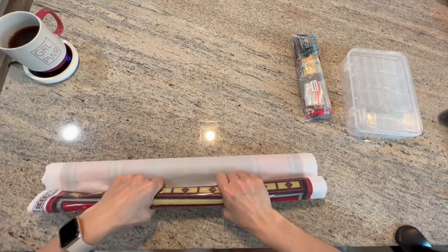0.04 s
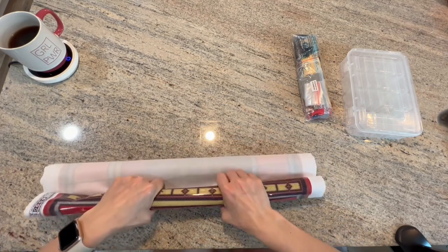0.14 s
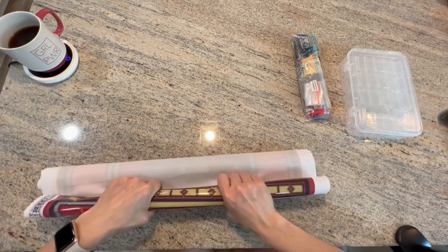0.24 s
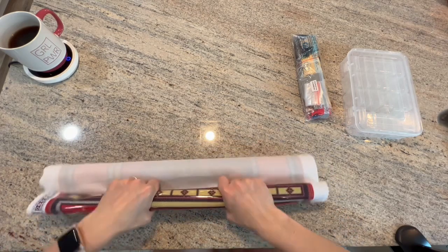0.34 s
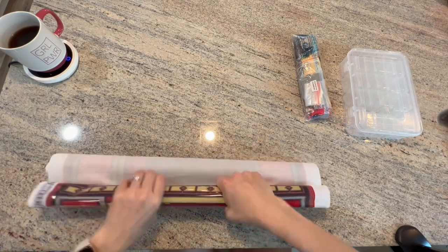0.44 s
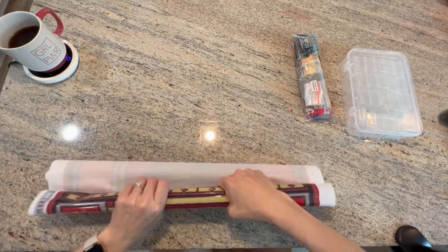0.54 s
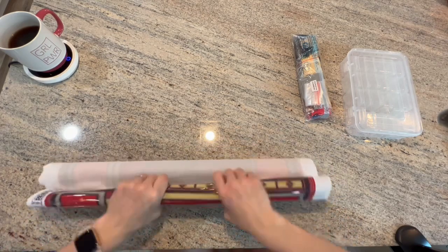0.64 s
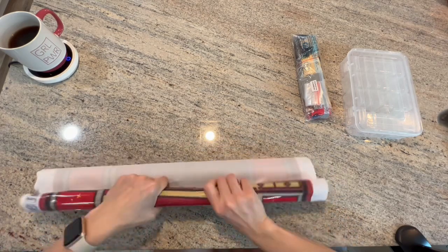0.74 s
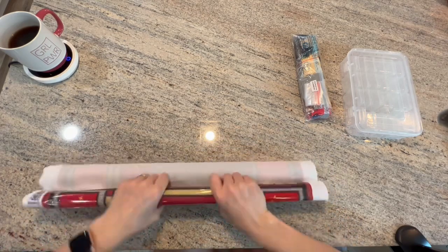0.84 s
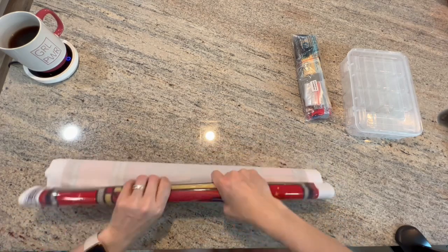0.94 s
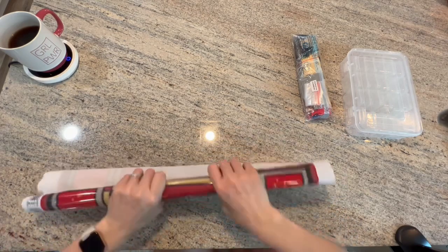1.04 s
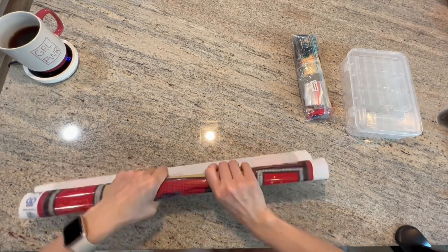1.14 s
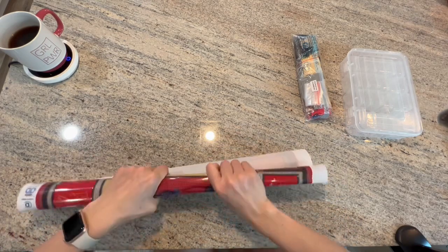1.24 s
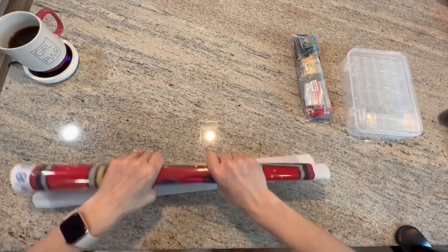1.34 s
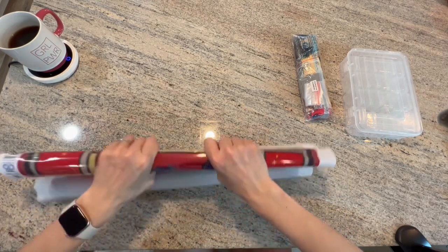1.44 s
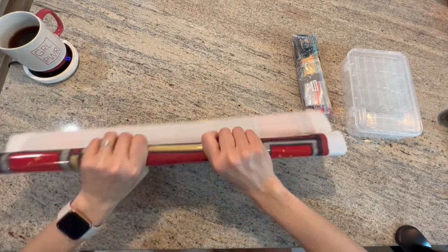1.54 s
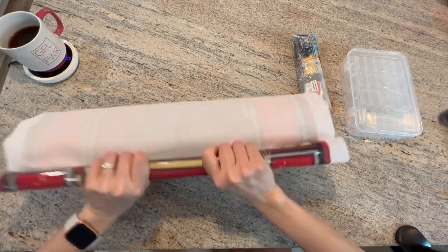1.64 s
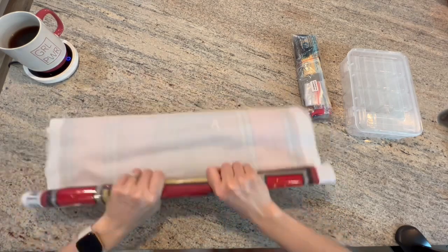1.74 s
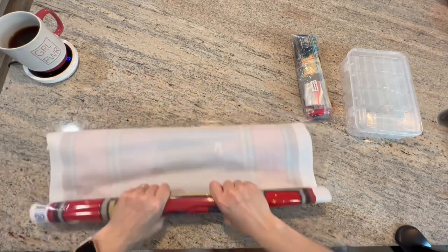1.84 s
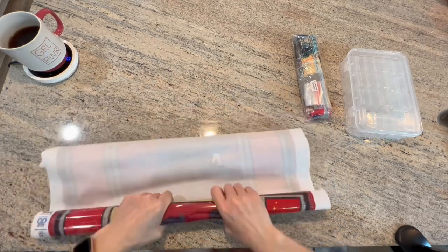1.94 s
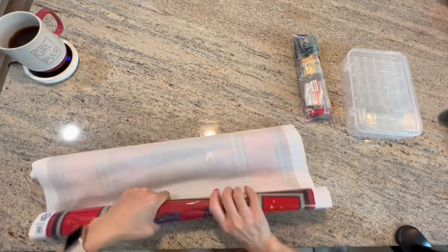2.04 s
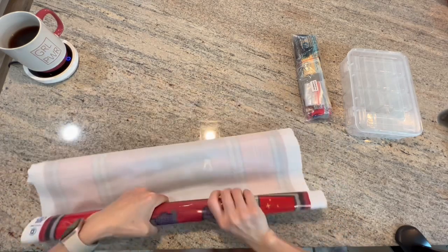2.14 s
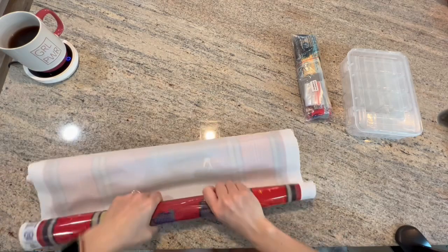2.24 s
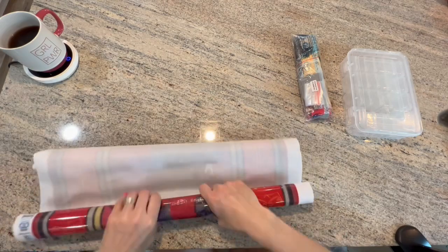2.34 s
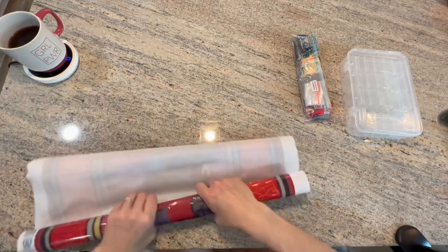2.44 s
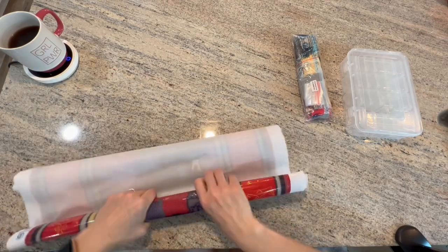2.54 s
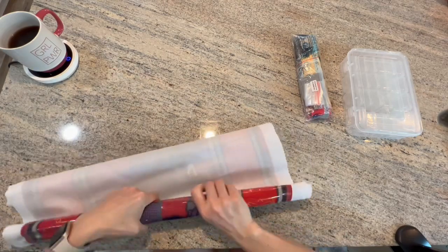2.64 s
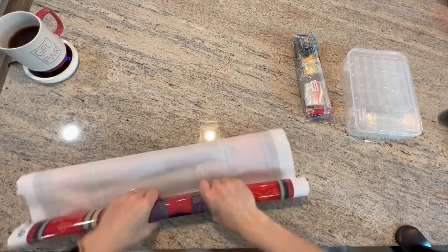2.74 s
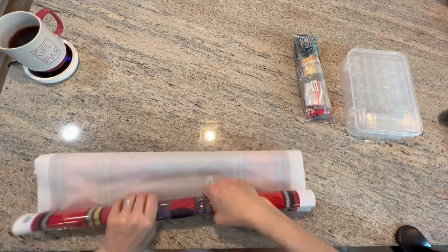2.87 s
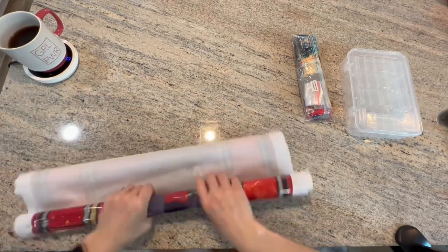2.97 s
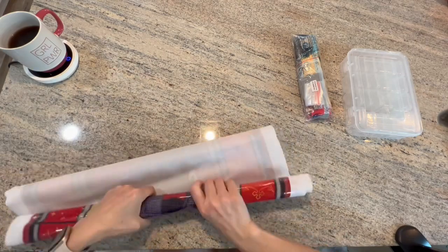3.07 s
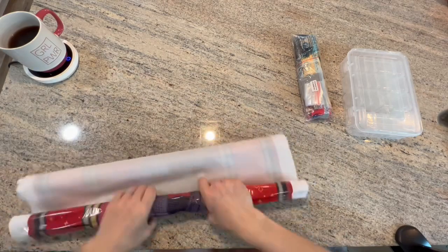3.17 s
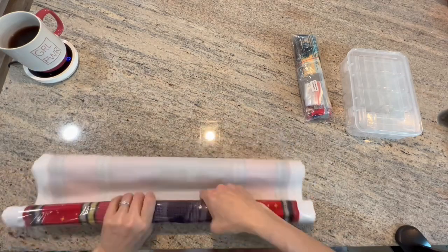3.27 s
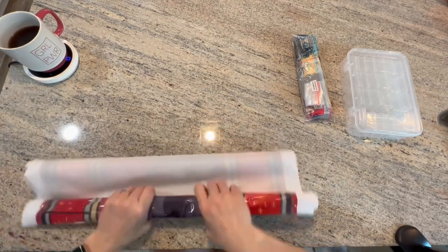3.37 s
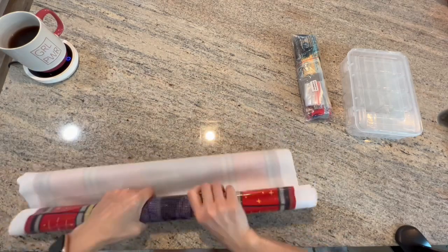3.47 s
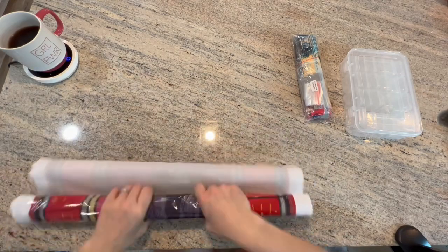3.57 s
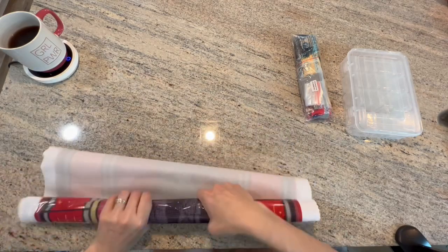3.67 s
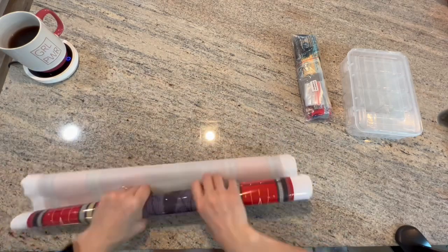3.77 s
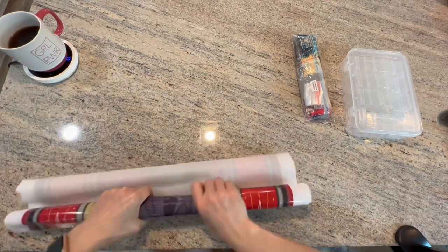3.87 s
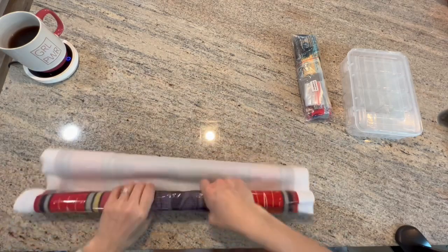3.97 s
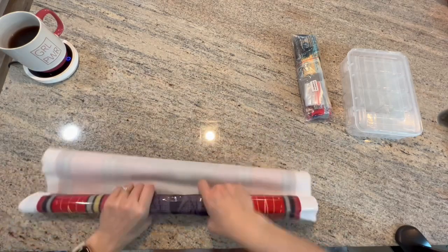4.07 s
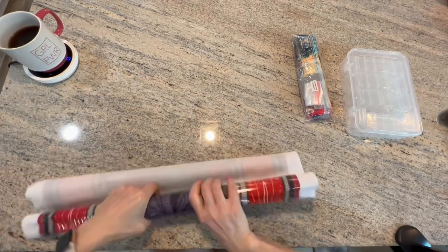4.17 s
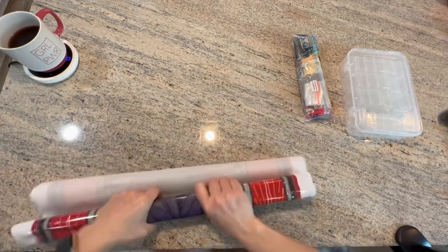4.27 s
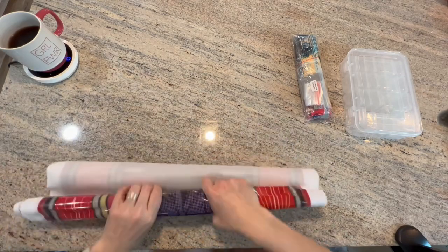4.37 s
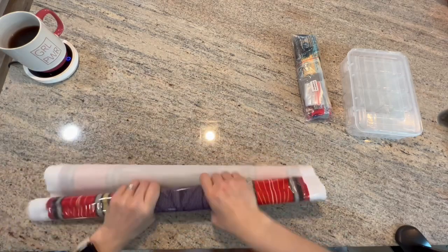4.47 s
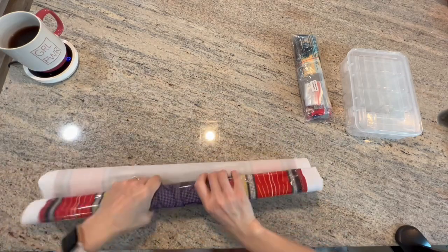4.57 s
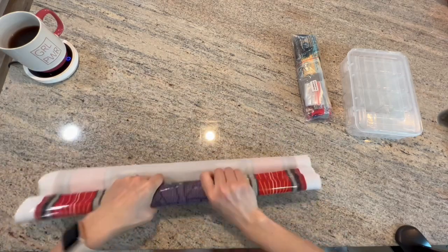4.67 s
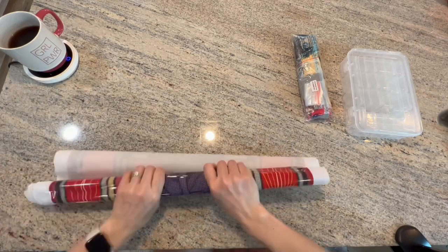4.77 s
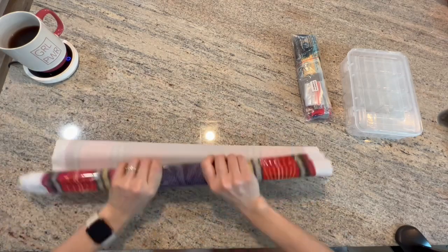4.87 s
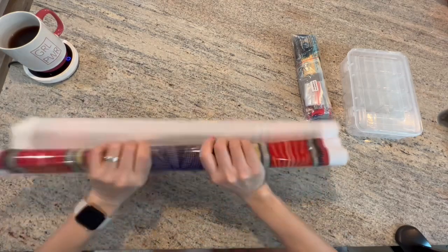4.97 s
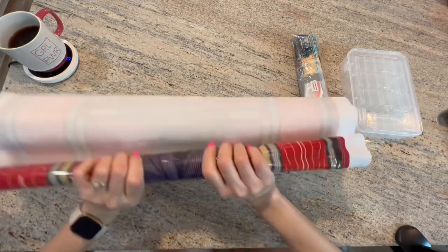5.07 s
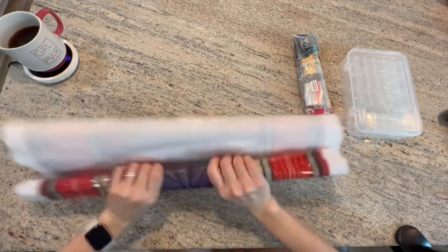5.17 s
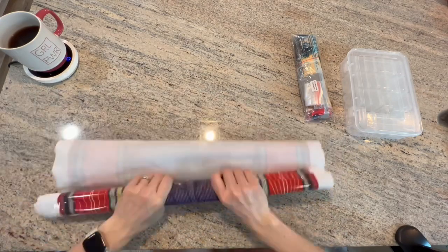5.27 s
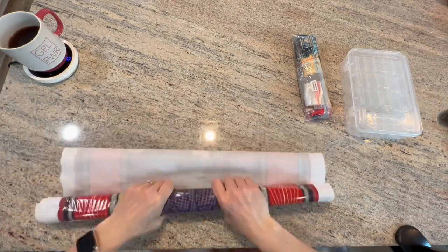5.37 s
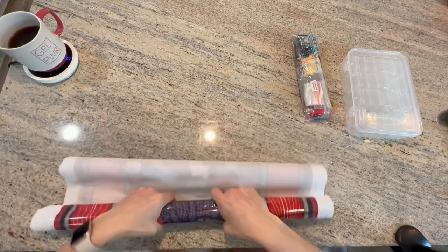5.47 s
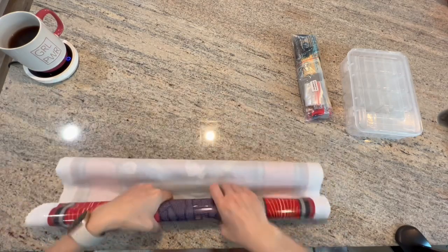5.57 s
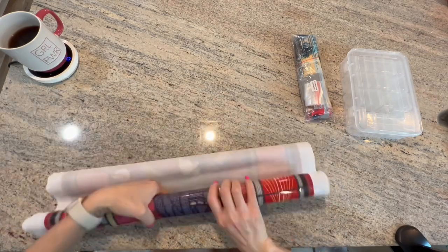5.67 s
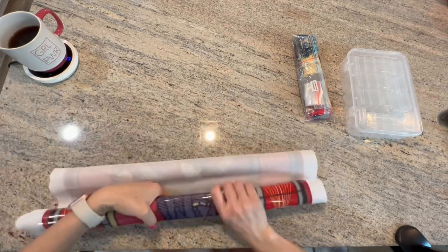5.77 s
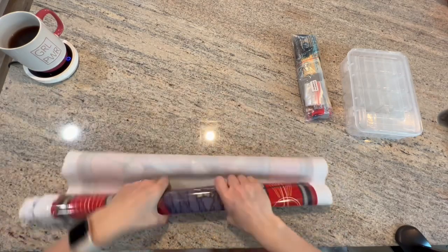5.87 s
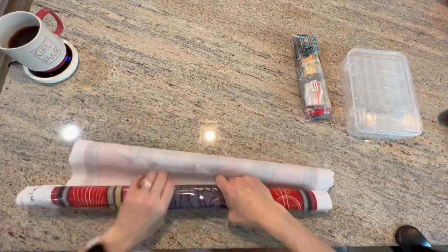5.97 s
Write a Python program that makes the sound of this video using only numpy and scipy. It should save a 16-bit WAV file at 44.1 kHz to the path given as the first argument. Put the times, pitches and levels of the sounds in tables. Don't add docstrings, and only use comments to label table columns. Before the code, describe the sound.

Close, dry handling of a stiff coated canvas roll in a kitchen: short rasping strokes, crackling film, hollow tube-like buckles, tiny ticks and low soft bumps on stone. Two sudden slaps stand out, one early and crisp, the other late, louder and deeper. Between them, steady uneven squeezing and sliding with woody-sounding creaks. Faint room reflections, wide close stereo.

```python
import sys
import numpy as np
from scipy import signal
from scipy.fft import rfft, irfft, next_fast_len
from scipy.io import wavfile
from scipy.ndimage import uniform_filter1d

SR = 44100
rng = np.random.default_rng(int(sys.argv[2]) if len(sys.argv) > 2 else 0)


def dump_mix(stems):
    frames = np.atleast_2d(stems).T
    limited = np.clip(frames, -1, 1)
    pcm = np.round(limited * 32767).astype(np.int16)
    wavfile.write(sys.argv[1], SR, pcm)


def ratio(d):
    e = np.asarray(d, float) / 20
    return 10 ** e


N = 265041


def evened(x):
    return x / np.sqrt(np.mean(x ** 2) + 1e-20)


def read(points, hz):
    f, value = np.transpose(points)
    return np.interp(np.log(hz + 1), np.log(f + 1), value)


def band(x, lo_hz, hi_hz, colour=((1, 0), (2, 0))):
    size = next_fast_len(x.shape[-1] + 2000)
    hz = np.fft.rfftfreq(size, 1 / SR) + 1
    edges = 1 / np.sqrt((1 + (lo_hz / hz) ** 6) * (1 + (hz / hi_hz) ** 6))
    return irfft(rfft(x, size) * edges * ratio(read(colour, hz)), size)[..., :x.shape[-1]]


def add(mix, s, sound, pan_db=0):
    part = mix[:, max(round(s * SR), 0):][:, :sound.shape[-1]]
    sides = ratio(np.array([[.5], [-.5]]) * pan_db)
    part += (sound * sides)[..., :part.shape[1]]


def ring(hz, t60, rise, turn=0, sag=0):
    t = np.arange(round((t60 + rise) * SR)) / SR
    turns = hz * (t + sag * 0.0037 * (1 - np.exp(-t / 0.0043))) + turn
    swing = np.sin(2 * np.pi * turns) * (1 - np.exp(-t / rise)) * ratio(-60 * t / t60)
    return swing / abs(swing).max()


def ring_pair(hz, t60, rise):
    return np.array([ring(hz, t60, rise, turn) for turn in (0, .25)])


def burst(t60, lo_hz, hi_hz, rise=0.0001):
    t = np.arange(round(t60 * SR) + 50) / SR
    puff = band(rng.standard_normal((2, len(t))), lo_hz, hi_hz)
    puff = puff * ratio(-60 * t / t60) * (1 - np.exp(-t / rise))
    return puff / abs(puff).max()


def resonate(x, hz, width_hz):
    turn = np.exp(2j * np.pi * np.cumsum(hz) / SR)
    r = np.exp(-np.pi * width_hz / SR)
    return 2 * (turn * signal.lfilter([1 - r], [1, -r], x / turn)).real


TUBE_HZ, TUBE_SHARE = 350, 0.18


def tube(x, kept):
    loop = np.zeros(round(SR / TUBE_HZ) + 1)
    loop[0], loop[-1] = 1, -np.clip(kept, 0, .9)
    return (1 - TUBE_SHARE) * x + TUBE_SHARE * signal.lfilter([1], loop, x)


def friction(per_s, spread_db, grain_s, flutter_db, flutter_s):
    slips = ratio(spread_db * np.minimum(rng.exponential(1, N), 5)) * (rng.random(N) < per_s / SR)
    keep = np.exp(-1 / (grain_s * SR))
    bursts = np.sqrt(signal.lfilter([1], [1, -keep], slips ** 2) + 1e-9)
    width = max(round(flutter_s * SR), 1)
    clumps = evened(uniform_filter1d(uniform_filter1d(rng.standard_normal(N), width), width))
    return bursts * ratio(flutter_db * clumps) * rng.standard_normal((2, N))


def crackle(per_s, spread_db, lo_hz, hi_hz, swings, count):
    size = ratio(spread_db * np.minimum(rng.exponential(1, N), 4)) * (rng.random(N) < per_s / SR)
    kind, out = rng.integers(0, count, N), np.zeros((2, N))
    for k, hz in enumerate(np.geomspace(lo_hz, hi_hz, count)):
        shape = ring_pair(hz, swings / hz, 0.11 / hz)
        out += signal.oaconvolve((size * (kind == k))[None], shape, axes=1)[:, :N]
    return evened(out)


GRID = 64
HOLD_SAG_DB_S = 6.5


def strokes(start, length, db, rise_db_s, fall_db_s):
    t = np.arange(0, N + GRID, GRID)[:, None] / SR
    db = db - HOLD_SAG_DB_S * np.clip(t - start, 0, length)
    rise_db = rise_db_s * np.maximum(start - t, 0)
    fall_db = fall_db_s * np.maximum(t - start - length, 0)
    return ratio(2 * (db - rise_db - fall_db))


def spread(slow):
    return np.interp(np.arange(N), np.arange(len(slow)) * GRID, slow)


# t/s, scrape/dB, flexing/dB, crinkle/dB, rumble/dB
SHUDDERS = [
    (1.74, -35.5, -28, -34, -36.5),
    (5.232, -45, -30, -33, -34),
]
SCRAPE, FLEX, CRINKLE, RUMBLE = 1, 2, 3, 4
SHUDDER_HOLD_S, SHUDDER_RISE_DB_S, SHUDDER_FALL_DB_S = 0.011, 2200, 148


def effort(power, rest_db, column):
    at, db = np.transpose(SHUDDERS)[[0, column]]
    landed = strokes(at, SHUDDER_HOLD_S, db, SHUDDER_RISE_DB_S, SHUDDER_FALL_DB_S)
    return spread(np.sqrt(power.sum(1) + landed.sum(1) + ratio(2 * rest_db)))


# (density, per Hz)
SHEET_COLOUR = [(25, -14), (60, -2), (125, -2.5), (300, 0), (700, -0.5), (1300, -4), (2200, -6.5),
                (4000, -9), (6000, -10), (9000, -14.5), (10500, -13), (12000, -14), (14000, -23),
                (16000, -14.5)]


def sheet_band(x, lo_hz, hi_hz):
    return evened(band(x, lo_hz, hi_hz, SHEET_COLOUR))


# start t/s, length/s, scrape level/dB, crinkle re scrape/dB
SLIDES = [(0, 0.0039, -43.5, -5), (0.097, 0.017, -36.5, -18), (0.204, 0.082, -36, -7.5),
          (.31, 0.087, -40, -7.5), (0.478, 0.03, -41, -10), (0.534, 0.092, -37.5, -7),
          (0.65, 0.021, -38, -6), (0.722, 0.014, -39, -4.5), (0.77, 0.024, -44, -5.5),
          (0.796, 0.061, -40.5, -5), (0.976, 0.06, -41, -7), (1.04, 0.041, -38.5, -6),
          (1.142, 0.036, -40, -7), (1.185, 0.04, -43, -7), (1.252, 0.037, -47, -10), (1.3, .06, -49, -12),
          (1.383, 0.21, -53, -15), (1.698, 0.035, -44, -6), (1.901, 0.048, -44.5, -4.5),
          (2.139, 0.054, -45, 1), (2.204, 0.033, -43.5, -2.5), (2.33, 0.08, -49.5, -6),
          (2.425, 0.097, -45, -4), (2.584, 0.076, -41.5, -2.5), (2.7, 0.074, -48.5, -9),
          (2.808, 0.06, -45, -6), (2.895, .07, -45, -5.5), (2.996, 0.018, -41.5, -6),
          (3.059, 0.14, -45, -5.5), (3.287, 0.04, -43.5, -3.5), (3.342, 0.035, -43, -10),
          (3.467, 0.089, -43.5, -7), (3.608, 0.045, -44, -8), (3.665, .075, -43.5, -8),
          (3.814, 0.18, -42.5, -7), (4.064, 0.092, -42, -7), (4.232, 0.13, -43, -8.5),
          (4.442, 0.055, -44, -12), (4.601, 0.04, -48.5, -12), (4.66, 0.085, -49, -12),
          (4.814, 0.054, -43, -17), (4.94, 0.13, -50.5, -4.5), (5.086, 0.12, -45.5, -4.5),
          (5.391, 0.031, -47.5, 2.5), (5.556, 0.03, -45.5, -6), (5.648, 0.056, -50.5, -2),
          (5.783, 0.067, -45, -4), (5.89, 0.04, -45, -4.5)]
SLIDE_RISE_DB_S, SLIDE_FALL_DB_S = 581, 145
REST_SCRAPE_DB, REST_CRINKLE_DB = -58, -60


def sliding(fine):
    start, length, db, film_db = np.transpose(SLIDES)
    drags = strokes(start, length, db, SLIDE_RISE_DB_S, SLIDE_FALL_DB_S)
    peels = strokes(start, length, db + film_db, SLIDE_RISE_DB_S, SLIDE_FALL_DB_S)
    drag = effort(drags, REST_SCRAPE_DB, SCRAPE)
    peel = effort(peels, REST_CRINKLE_DB, CRINKLE)
    scrape = drag * ratio(-0.5) * sheet_band(fine, 1680, 8400)
    crinkle = peel * ratio(4.0) * sheet_band(fine, 8750, 17500)
    creases = crackle(per_s=120, spread_db=3.5, lo_hz=900, hi_hz=6400, swings=8, count=10)
    return scrape + crinkle + drag * ratio(-6.0) * creases


# start t/s, length/s, level/dB, bending f/Hz
FLEXES = [(0, 0.0082, -41, 1550), (0.1, 0.052, -43, 1030), (0.226, 0.014, -32.5, 1680),
          (0.316, 0.071, -43.5, 1020), (0.554, 0.043, -37.5, 1360), (0.65, 0.022, -42, 1200),
          (.725, 0.017, -42, 1200), (.77, 0.046, -42.5, 900), (.84, .035, -45.5, 900),
          (0.99, 0.086, -40.5, 1690), (1.142, 0.04, -39, 915), (1.198, 0.049, -42, 900),
          (1.27, .08, -47, 1300), (1.505, 0.048, -47.5, 1380), (1.71, 0.011, -55, 710),
          (1.878, 0.089, -46, 1090), (2.152, 0.026, -43, 1100), (2.181, 0.064, -40.5, 900),
          (2.39, 0.12, -41, 1130), (2.582, 0.1, -42, 1200), (2.72, 0.047, -44, 1390),
          (2.82, 0.046, -42, 1000), (2.9, .06, -42, 1200), (3.004, 0.012, -39, 1150),
          (3.073, 0.12, -42, 1210), (3.292, 0.079, -38, 1240), (3.48, 0.083, -41.5, 970),
          (3.62, 0.12, -44, 1510), (3.8, .1, -45, 1400), (3.92, 0.074, -43, 1250), (4.02, 0.043, -45, 1400),
          (4.1, 0.076, -44, 1400), (4.286, 0.062, -40, 1220), (4.48, 0.022, -40.5, 1320),
          (4.592, 0.14, -47, 1210), (4.825, 0.035, -43, 915), (5.12, 0.098, -47.5, 800),
          (5.273, 0.043, -34, 1020), (5.385, .06, -39, 1120), (5.584, 0.0083, -39.5, 1190),
          (5.66, 0.18, -47, 1141), (5.897, 0.029, -41, 1200)]
FLEX_RISE_DB_S, FLEX_FALL_DB_S, REST_FLEX_DB = 273, 245, -50.5
TIGHT_HZ, TIGHT_DB_PER_OCTAVE = 1200, -2
BEND_WIDTH_HZ, TUBE_RING = 420, 1


def flexing(fine, coarse):
    start, length, db, hz = np.transpose(FLEXES)
    squeezes = strokes(start, length, db, FLEX_RISE_DB_S, FLEX_FALL_DB_S)
    squeeze = effort(squeezes, REST_FLEX_DB, FLEX)
    pitch_hz = spread(squeezes @ hz / squeezes.sum(1))
    loose = ratio(TIGHT_DB_PER_OCTAVE * np.log2(pitch_hz / TIGHT_HZ))
    hollow = loose * tube(coarse + 0.75 * fine, TUBE_RING)
    bending = hollow + ratio(3.5) * resonate(coarse, pitch_hz, BEND_WIDTH_HZ)
    return squeeze * ratio(1.0) * sheet_band(bending, 273, 2500)


# t/s, level/dB
PRESSES = [(0, -65), (.14, -56), (.24, -65), (.37, -60), (.47, -54), (.68, -53), (.86, -56), (1.2, -58),
           (2.23, -56), (2.44, -50), (2.64, -51), (2.86, -54), (3.02, -51), (3.19, -46.5), (3.3, -47.5),
           (3.47, -48), (3.57, -53), (3.81, -50.5), (3.97, -51), (4.11, -49), (4.24, -53), (4.33, -47),
           (4.51, -50), (4.9, -72), (5.15, -48), (5.42, -45), (5.585, -49), (5.72, -52), (5.93, -45.5)]
PRESS_S, PRESS_RISE_DB_S, PRESS_FALL_DB_S, REST_RUMBLE_DB = 0.0089, 248, 190, -61.5


def pressing():
    lumps = friction(per_s=150, spread_db=1.5, grain_s=.02, flutter_db=.8, flutter_s=.02)
    start, db = np.transpose(PRESSES)
    presses = strokes(start, PRESS_S, db, PRESS_RISE_DB_S, PRESS_FALL_DB_S)
    return effort(presses, REST_RUMBLE_DB, RUMBLE) * ratio(1.0) * sheet_band(lumps, 31, 212)


def handling():
    fine = evened(friction(per_s=1500, spread_db=2.4, grain_s=.003, flutter_db=.8, flutter_s=.015))
    coarse = evened(friction(per_s=400, spread_db=2.3, grain_s=0.0067, flutter_db=.9, flutter_s=0.0085))
    return sliding(fine) + flexing(fine, coarse) + pressing()


# t/s, peak level/dB, f/Hz, swings/1
POPS = [(0.1, -30, 696, 8), (0.232, -16, 1800, 6.3), (0.458, -28.5, 740, 6.8), (0.2127, -17, 2200, 4.5),
        (0.23, -19.5, 2400, 11), (0.283, -25, 2250, 19), (0.872, -24.5, 542, 7), (1.704, -21.5, 606, 5.7),
        (3.002, -18, 2900, 4.9), (3.006, -27, 584, 5.3), (3.19, -19.5, 1280, 5.6), (3.194, -15, 1370, 1.9),
        (3.381, -27.5, 1570, 21), (3.493, -21.5, 900, 2.7), (3.572, -26.5, 1720, 15),
        (3.752, -19, 1300, 3.2), (3.926, -24, 1110, 6.5), (3.973, -24, 1160, 6.8),
        (4.032, -24.5, 1630, 5.4), (4.125, -16.5, 1460, 6.2), (4.349, -13, 1180, 3.5),
        (4.355, -19.5, 1140, 6.7), (4.496, -25.5, 1070, 13), (4.84, -28, 512, 12.6), (4.85, -24, 930, 8.7),
        (2.749, -28, 1540, 11), (5.431, -23, 1180, 12), (5.595, -19.5, 1096, 7.4), (5.909, -24, 1470, 7.4),
        (5.9359, -19, 1540, 2.1)]
POP_RING = .7


def pops():
    mix = np.zeros((2, N))
    for s, db, hz, swings in POPS:
        add(mix, s, ratio(db) * ring_pair(hz, swings / hz, 0.28 * swings / hz))
    return tube(mix, POP_RING)


# t/s, peak level/dB, f/Hz
BUMPS = [(0.868, -34, 350), (1.155, -28.5, 366), (1.589, -37, 497), (2.435, -38.5, 143),
         (2.593, -34.5, 345), (2.688, -39, 253), (2.824, -35, 258), (3.104, -32.5, 350), (3.201, -45, 88),
         (3.279, -41, 357), (3.461, -38, 123), (3.574, -40.5, 127), (3.681, -31.5, 356), (3.97, -38, 232),
         (4.226, -36.5, 425), (4.837, -47, 494), (5.107, -35, 462), (5.135, -26.5, 514),
         (5.663, -36.5, 223), (5.794, -29, 350), (5.937, -28, 323)]


def bumps():
    mix = np.zeros((2, N))
    for s, db, hz in BUMPS:
        add(mix, s, ratio(db) * ring_pair(hz, 6.5 / hz, 0.005))
    return mix


# start t/s, length/s, level/dB, f/Hz
CREAKS = [(.095, 0.029, -39, 700), (.205, .05, -37, 1900), (0.358, 0.039, -41, 700), (.54, .04, -42, 1900),
          (.77, 0.043, -41.5, 500), (1.05, 0.039, -41, 600), (1.136, .045, -41, 960),
          (1.199, 0.051, -43.5, 690), (2.168, .04, -39.5, 720), (2.169, 0.038, -42, 1644),
          (2.469, 0.029, -43, 1600), (2.576, .03, -45, 1094), (2.599, .06, -48, 1450),
          (2.715, .06, -44, 1570), (2.85, .025, -44, 1400), (3.35, 0.044, -41, 1530),
          (3.469, 0.044, -41.5, 955), (3.52, .04, -47, 970), (3.72, .055, -43, 1760),
          (3.72, 0.047, -44, 1280), (3.908, .055, -42.5, 1650), (3.909, .05, -43, 1100),
          (4.1, .04, -40, 1460), (4.36, .025, -44, 1200), (4.488, .025, -40, 1250), (4.835, .025, -40, 900),
          (5.245, .02, -31, 650), (5.27, .03, -34, 600), (1.775, .02, -32, 1000), (5.28, .02, -34.5, 1105),
          (5.304, .03, -34.5, 1050), (5.39, 0.039, -46, 1100), (5.565, 0.037, -41.5, 1200),
          (5.891, 0.042, -42, 1400), (1.81, 0.043, -38.5, 797)]
CREAK_WIDTH_HZ = 150


def creaks():
    mix = np.zeros((2, N))
    for s, length, db, hz in CREAKS:
        swell = np.hanning(round(1.5 * length * SR)) ** 0.8
        note = rng.standard_normal((2, SR // 5))
        for _ in range(2):
            note = resonate(note, np.full(SR // 5, hz), CREAK_WIDTH_HZ)
        add(mix, s - length / 4, ratio(db) * swell * evened(note[:, -len(swell):]))
    return mix


# t/s, peak level/dB, top end re rest/dB
TICKS = [(0.084, -30, -13), (0.2606, -19.5, -9), (0.282, -23, -3), (0.329, -33, -24), (0.4873, -30, -24),
         (0.518, -27, -17), (0.6544, -22, -13), (0.7234, -20.5, -11), (0.9747, -27, -29),
         (1.6955, -26.5, -11), (1.7392, -7.5, -21), (2.131, -28, -1.5), (2.2316, -27, -3),
         (2.6472, -27, -1), (2.659, -41, 12), (2.725, -28, -7), (2.9996, -21, -16), (3.07, -28, -5),
         (3.1916, -21, -13), (3.4796, -28, -9), (3.5286, -25, -5.5), (3.799, -26.5, -8),
         (3.9475, -28.5, -1.5), (4.147, -26, -11), (4.1685, -31, -4), (5.044, -27.5, -12),
         (5.089, -31, -17), (5.4288, -16, -22), (5.877, -36, 1), (5.9335, -24.5, -12.5)]


def ticks():
    mix = np.zeros((2, N))
    for s, db, top_db in TICKS:
        add(mix, s, ratio(db) * burst(.009, 1600, 5800))
        add(mix, s, ratio(db + top_db + 13.5) * burst(0.008, 10300, 15700))
    return mix


# t/s, peak level/dB, f/Hz
SNAPS = [(0.0837, -25, 1710), (0.2009, -23, 1480), (0.2064, -21, 1500), (0.2164, -16, 2190),
         (0.2384, -23, 1730), (0.2446, -25, 1870), (0.2504, -23, 2530), (0.2654, -22, 5180),
         (0.2818, -20, 2410), (0.328, -22, 2290), (0.3804, -24, 1040), (0.4724, -28, 2400),
         (0.4867, -20, 3140), (0.5172, -21, 5570), (0.5504, -23, 1860), (0.653, -26, 4690),
         (0.7267, -23, 4980), (0.7742, -29, 1100), (0.8074, -26, 2580), (0.843, -29, 1020),
         (0.9745, -23, 5040), (1.0594, -23, 2420), (1.1395, -27, 1110), (1.1674, -26, 1000),
         (1.703, -26, 1030), (1.7447, -14, 1230), (2.6174, -28, 1000), (2.6247, -26, 1230),
         (2.7292, -26, 1520), (2.8567, -31, 1020), (2.903, -29, 1210), (3.0016, -22, 3180),
         (3.0654, -29, 1360), (3.1906, -21.5, 1160), (3.294, -32, 1360), (3.5279, -35, 1030),
         (3.571, -27, 1740), (3.6654, -31, 5010), (3.7577, -27, 1210), (3.8127, -28, 1410),
         (4.0297, -41, 1250), (4.0297, -26, 1580), (4.1308, -25, 1410), (4.348, -22, 1040),
         (4.4984, -26, 1020), (4.6164, -31, 1010), (4.8514, -30, 1020), (5.0439, -34, 1450),
         (5.0883, -32, 1240), (5.4292, -22, 1230), (5.57, -29, 1100), (5.7723, -30, 1540),
         (5.9194, -28, 1370), (5.9334, -21.5, 1090)]
SNAP_SWINGS, SNAP_DB = 5, 1.5


def snaps():
    mix = np.zeros((2, N))
    for s, db, hz in SNAPS:
        add(mix, s, ratio(db + SNAP_DB) * ring_pair(hz, SNAP_SWINGS / hz, .2 / hz))
    return mix


# t/s, peak level/dB
FLICKS = [(0.0952, -29), (0.229, -17), (0.4015, -32.5), (0.8824, -30), (1.9036, -25.5), (2.0106, -34),
          (2.1067, -33), (2.5735, -28), (3.0584, -33), (3.2929, -39), (3.5838, -26.5), (3.8694, -41),
          (4.0377, -30), (4.0814, -30), (4.4194, -48), (4.8479, -39), (4.9871, -33), (5.6194, -44),
          (5.669, -42), (5.7229, -41), (5.7723, -31.5), (5.8394, -37)]


def flicks():
    mix = np.zeros((2, N))
    for s, db in FLICKS:
        add(mix, s, ratio(db + 5.5) * burst(0.011, 11300, 16000))
    return mix


# t/s, peak level/dB, f/Hz, t60/s, rise/s
SLAPS = [(1.7417, -15.5, 507, 0.026, 0.00089), (1.7486, -13, 281, 0.022, 0.0021),
         (1.760, -26, 714, 0.013, .001), (1.764, -15.5, 920, 0.0067, 0.00064),
         (1.799, -23, 700, 0.01, .001), (5.224, -26.5, 830, 0.04, 0.0048), (5.2357, -3.5, 343, 0.02, 0.015),
         (5.255, -18, 293, 0.024, .004), (5.2415, -15, 335, 0.07, 0.004), (5.238, -20, 221, 0.054, 0.0045),
         (5.235, -22, 1030, 0.038, 0.0011), (5.222, -33, 440, 0.045, 0.0054),
         (5.256, -32, 1090, 0.028, 0.0019), (5.285, -22, 390, 0.038, 0.0024),
         (5.312, -32, 346, 0.032, .004)]


def slaps():
    mix = np.zeros((2, N))
    for s, db, hz, t60, rise in SLAPS:
        add(mix, s, -ratio(db) * ring(hz, t60, rise, sag=0.23)[None])
    return mix


# t/s, peak level/dB, top end re rest/dB, t60/s
CRACKS = [
    (1.738, -20, 2, 0.023),
    (5.2348, -12.5, -5, .012),
    (1.7397, -14, 4, 0.022),
    (5.234, -7.5, -1, 0.014),
]


def cracks():
    mix = np.zeros((2, N))
    for s, db, top_db, t60 in CRACKS:
        add(mix, s, ratio(db) * burst(t60, 2900, 4600, rise=0.00015), pan_db=3.0)
        add(mix, s, ratio(db + top_db) * burst(t60, 5100, 18000, rise=0.00054))
    return mix


# f/Hz, t60/s
ROOM = [(200, 0.45), (1000, 0.27), (4000, 0.72), (12000, 0.37)]


def kitchen(x):
    taps = np.zeros((2, SR // 2))
    at = np.arange(200, SR // 2 - 20, 20) + rng.integers(0, 20, (2, (SR // 2 - 201) // 20))
    np.put_along_axis(taps, at, rng.choice([-1., 1.], at.shape), 1)
    hz, t, z = signal.stft(taps, SR, nperseg=256)
    tail = signal.istft(z * ratio(-60 * t / read(ROOM, hz)[:, None]), SR, nperseg=256)[1]
    return signal.fftconvolve(x, tail / np.linalg.norm(tail[0]), axes=1)[:, :N]


# f/Hz, share/1
SAME = [(60, 0.87), (330, 0.91), (800, 0.27), (2000, 0.15), (8500, 0.05), (10000, 0.38), (12000, 0.87),
        (16000, 0.52)]
# f/Hz, phase/turns
AHEAD = [(0, 0), (700, -.16), (2000, -.2), (4500, -.08), (8450, 2), (19100, 5)]


def ports(pair):
    left, own = rfft(pair)
    hz = np.fft.rfftfreq(N, 1 / SR)
    same = np.clip(read(SAME, hz), 0, 1)
    early = np.exp(2j * np.pi * np.interp(hz, *np.transpose(AHEAD)))
    right = same * early * left + np.sqrt(1 - same ** 2) * own
    return irfft(np.array([left, right]), N)


ROOM_DB, SLAP_TO_ROOM_DB = -5, -7.0


def scene():
    sheet = pops() + bumps() + creaks()
    sharp = ticks() + snaps() + flicks()
    landing = slaps() + cracks()
    echo = ratio(ROOM_DB) * kitchen(sheet + sharp + ratio(SLAP_TO_ROOM_DB) * landing)
    return ports(handling() + sheet + echo) + sharp + landing


def low_pass(x):
    return signal.sosfilt(signal.butter(12, 16960, fs=SR, output="sos"), x)


# f/Hz, level/dB
LEAN = [(60, 0.5), (500, 0.5), (1200, 2.5), (2700, 1.5), (4200, 4), (6400, 8.5), (8200, 3), (9500, 0.5),
        (10500, -2.5), (16000, 1)]
BASS_CUT_HZ, EDGE_HZ, EDGE_DB = 37, 15780, -62


def record(dry):
    hz = np.fft.rfftfreq(N, 1 / SR)
    colour_db = read(LEAN, hz) * np.array([[.5], [-.5]]) + EDGE_DB * (hz > EDGE_HZ)
    bass_cut = 1 / np.sqrt(1 + (BASS_CUT_HZ / (hz + 1)) ** 6)
    mix = irfft(rfft(dry) * ratio(colour_db) * bass_cut, N)
    return low_pass(mix)


dry = scene()
out = record(dry)
dump_mix(out)
```